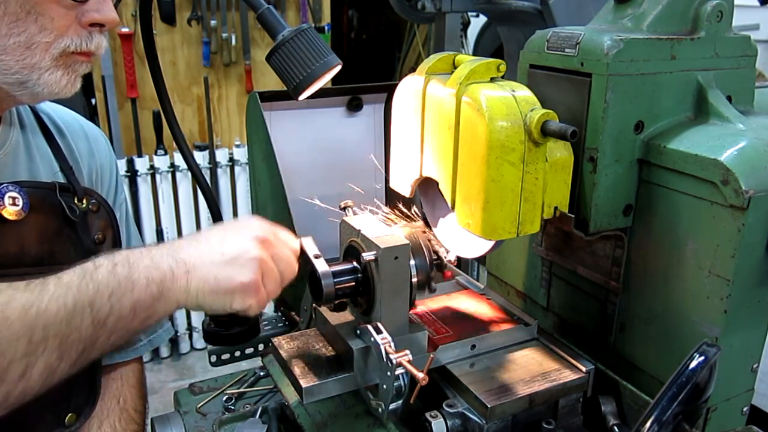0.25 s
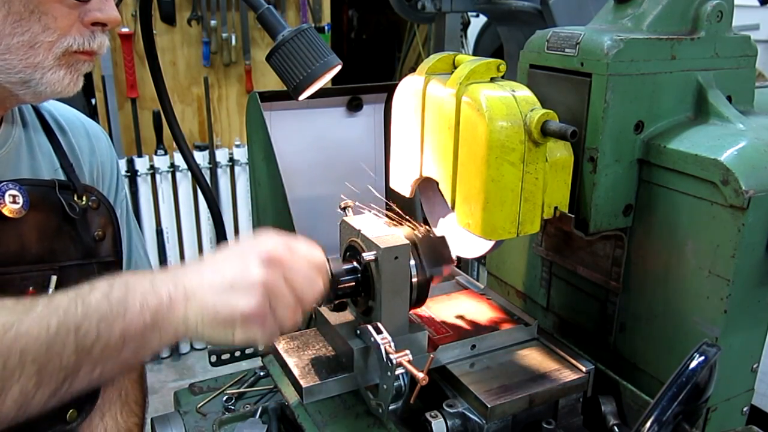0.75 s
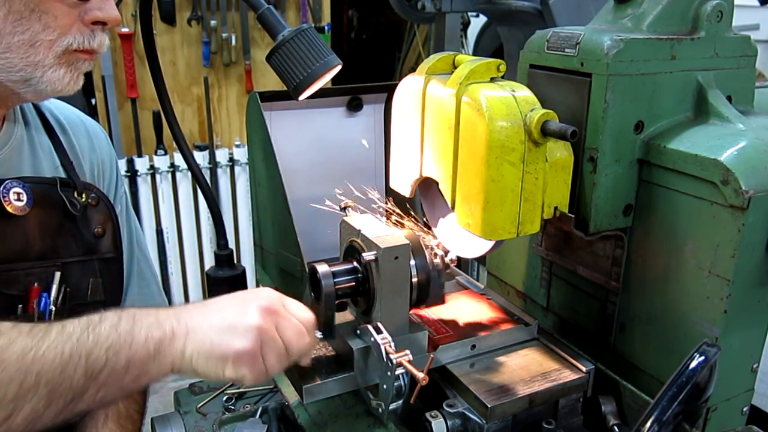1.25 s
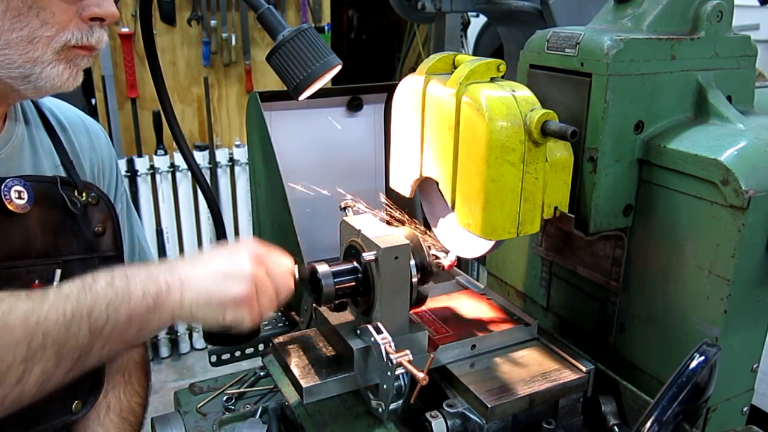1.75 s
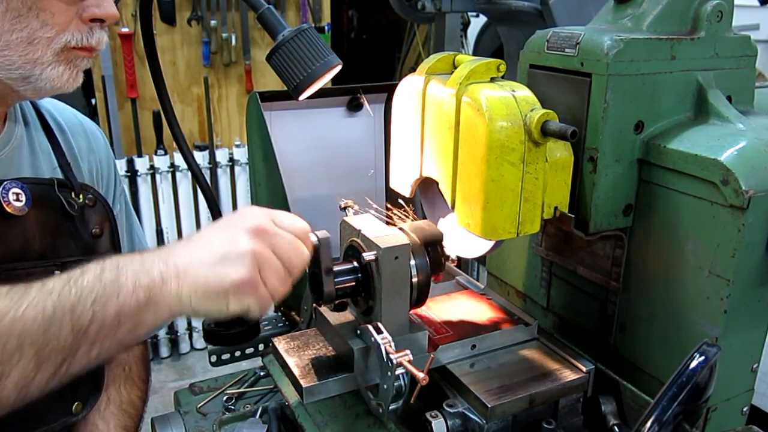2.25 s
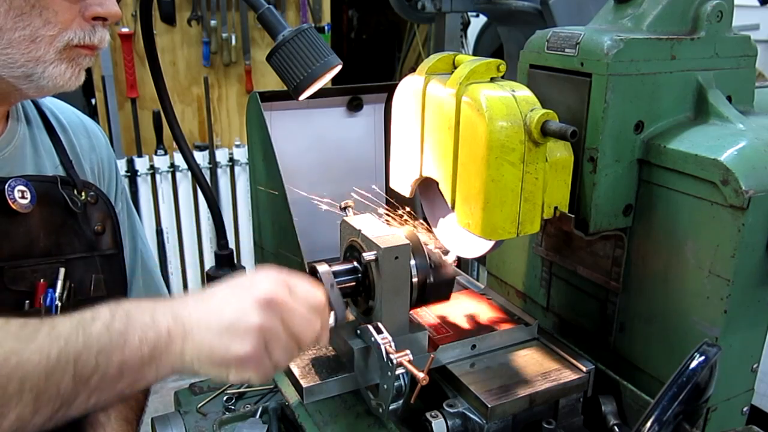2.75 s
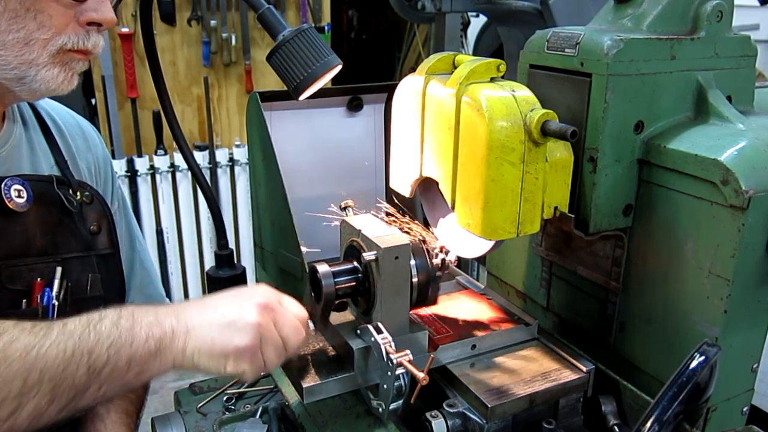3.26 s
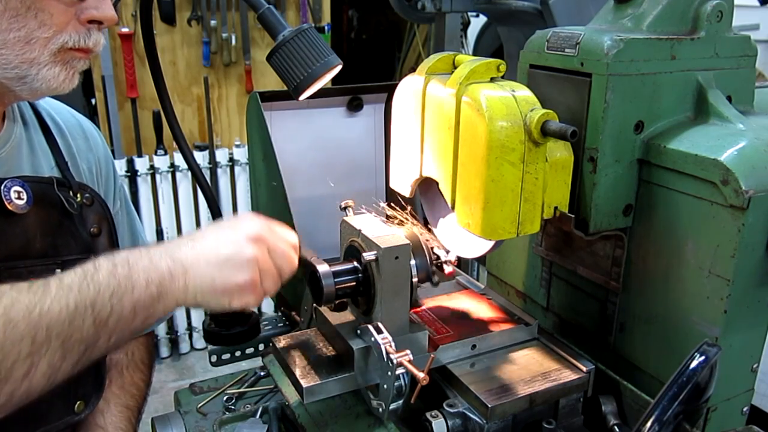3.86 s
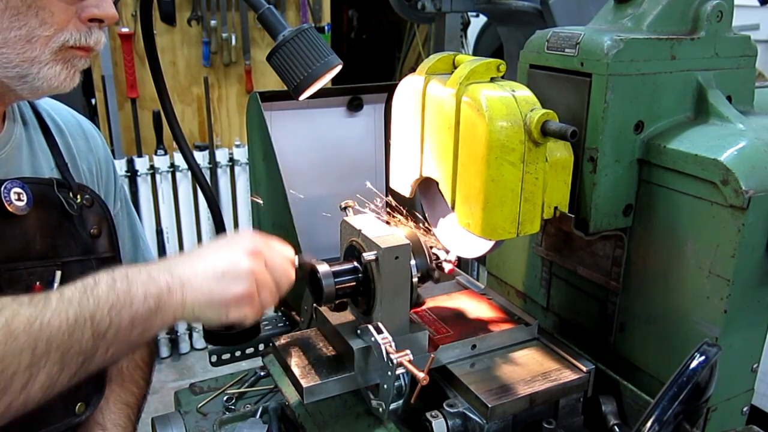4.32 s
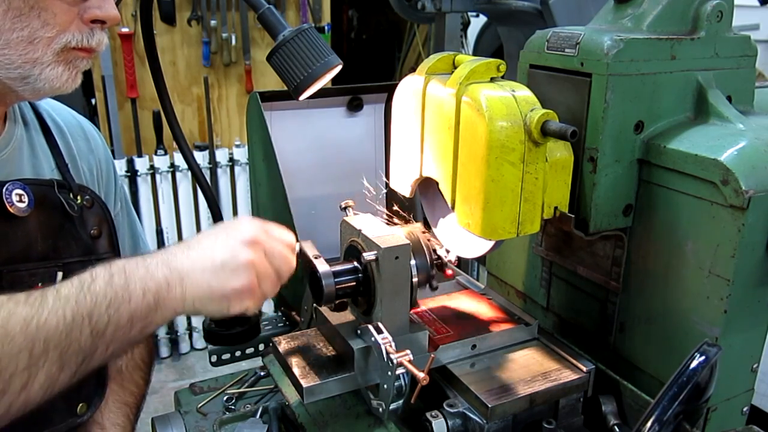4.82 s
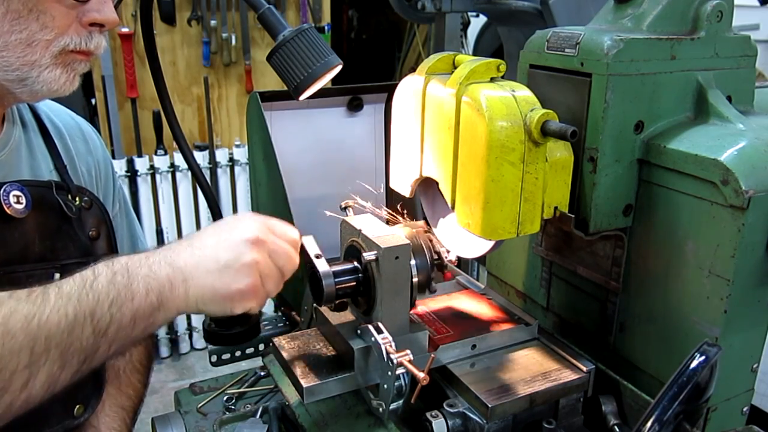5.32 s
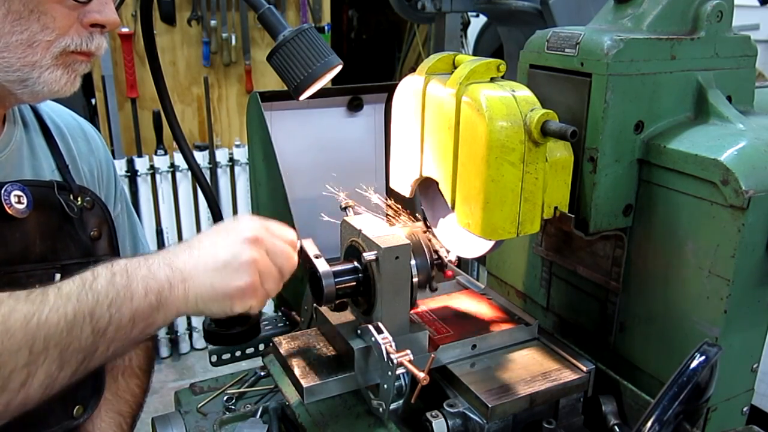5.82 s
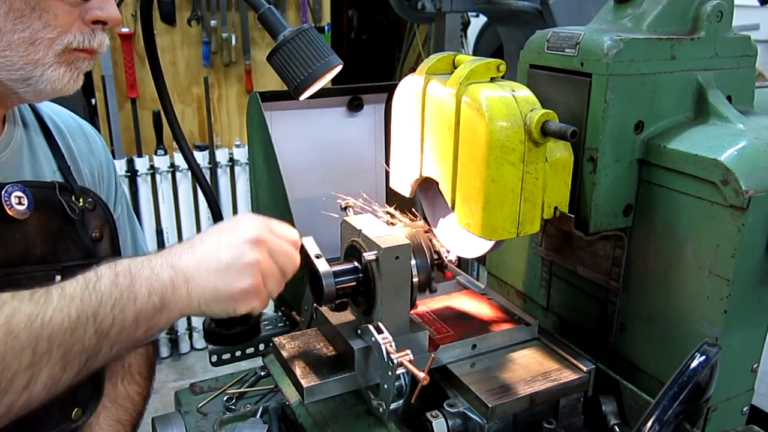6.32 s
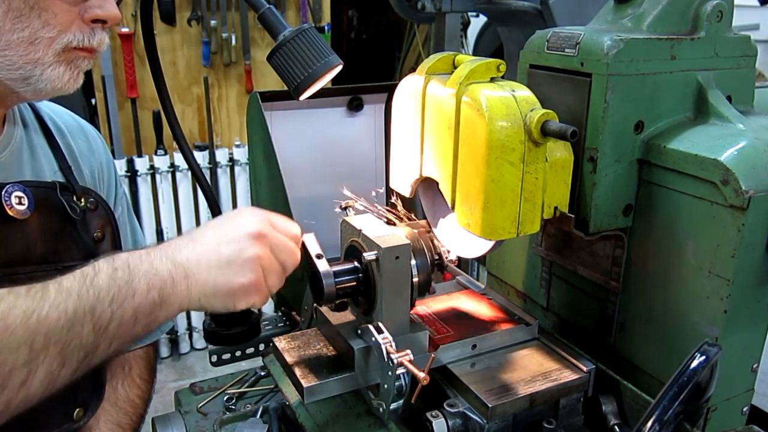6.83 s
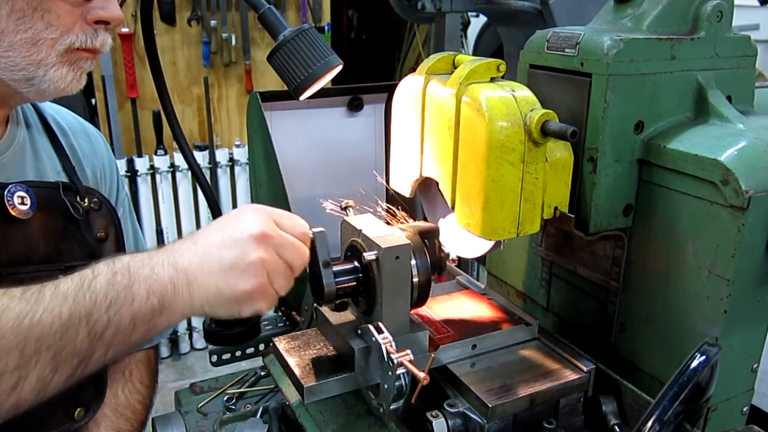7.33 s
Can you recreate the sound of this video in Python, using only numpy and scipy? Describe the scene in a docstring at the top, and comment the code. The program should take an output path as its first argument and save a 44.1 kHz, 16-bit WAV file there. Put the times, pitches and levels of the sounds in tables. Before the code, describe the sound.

Close in a small workshop, a constant electric machine whine carries fine gritty grinding hiss and thin metallic ringing that changes pitch with each half-second crank turn.

```python
"""A surface grinder's motor whines on many multiples of its shaft speed, in clusters that throb once a turn.
A steel part is cranked round by hand against the wheel, close by in a small shop: each angle of the part
sings with its own high resonances, made from wandering tones, and the grit hisses as shaped noise.
Below lie the steady hum tones of spindle, mains and drive, and the noise of air dragged by the wheel."""
import sys
import numpy as np
from scipy import signal
from scipy.fft import rfft, irfft, next_fast_len
from scipy.io import wavfile
from scipy.ndimage import uniform_filter1d, map_coordinates

SR = 44100
rng = np.random.default_rng(int(sys.argv[2]) if len(sys.argv) > 2 else 0)


def generate_wav(sig):
    """Save sig (samples, or channels by samples) to the path in sys.argv[1] as 16-bit PCM at SR."""
    pcm = np.round(np.clip(np.atleast_2d(sig).T, -1, 1) * 32767).astype(np.int16)
    wavfile.write(sys.argv[1], SR, pcm)


N = 334278

SHAFT_HZ, WHEEL_HZ = 25.152, 59.75  # rotation rates of motor and wheel
TOP_HZ = 15700
# Moments at which the crank passes its zero angle. Each entry: time in seconds.
CRANK_PASS_S = [-.3, .09, .48, .87, 1.26, 1.65, 2.04, 2.43, 2.82, 3.22, 3.71, 4.18, 4.65, 5.15, 5.63, 6.14,
                6.63, 7.1, 7.55, 8]


def amp(db):
    """Decibels to gain."""
    return 10 ** (np.asarray(db) / 20)


def unit(x):
    """Scale to rms 1."""
    return x / np.sqrt(np.mean(x ** 2) + 1e-20)


def along(points, hz):
    """Interpolate (Hz, value) points on a log frequency axis."""
    f, v = np.transpose(points)
    return np.interp(np.log(hz + 1), np.log(f + 1), v)


def clock():
    """Time of every sample in seconds."""
    return np.arange(N) / SR


def swings(rows):
    """Each level column per sample, in dB about the mean of its rows."""
    s, *columns = np.transpose(rows)
    return [np.interp(clock(), s, column - np.mean(column)) for column in columns]


def wobble(knots_per_s):
    """Smooth random curve through normally distributed knots."""
    steps = np.arange(0, N / SR * knots_per_s + 1, 1 / 8)
    knots = rng.standard_normal(int(steps[-1]) + 4)
    return np.interp(clock() * knots_per_s, steps, map_coordinates(knots, [steps]))


def filtered(x, response):
    """Multiply the spectrum of x by a response of frequency."""
    size = next_fast_len(N + 8192)
    hz = np.fft.rfftfreq(size, 1 / SR)
    return irfft(rfft(x, size) * response(hz), size)[..., :N]


def rush(colour):
    """Stereo noise of the given colour with a mid of rms 1, less alike left and right in the treble."""
    # Each row: frequency in Hz, left-right likeness from 0 to 1.
    alike = [(60, .99), (200, 0.73), (640, 0.72), (1400, 0.69), (3100, 0.6), (6800, 0.38), (15000, 0.067)]

    def mid_side(hz):
        half_angle = np.arccos(np.clip(along(alike, hz), 0, 1)) / 2
        return colour(hz) * np.array([np.ones_like(hz), np.tan(half_angle)])

    mid, side = filtered(rng.standard_normal((2, N)), mid_side)
    return np.array([mid + side, mid - side]) / np.std(mid)


def flutter(x, depth_db):
    """Waver each narrow band in level by itself, alike left and right; depth_db is rms."""
    z = signal.stft(x, nperseg=512)[2]
    field = rng.standard_normal(z.shape[1:])
    field = uniform_filter1d(field, size=4, axis=0)  # across bins
    field = uniform_filter1d(field, size=7, axis=1)  # across frames
    return signal.istft(z * amp(depth_db * unit(field)), nperseg=512)[1][:, :N]


def revolve(lines, turns, size=16384):
    """Play one shaft turn, given as complex rms per multiple, over and over."""
    cycle = irfft(lines, size) * size / np.sqrt(2)
    return np.interp(turns % 1 * size, np.arange(size + 1), np.append(cycle, cycle[0]))


def motor(whine_db, overtone_db, drift=0.0001994, scatter_db=5.5, spread=0.19, loose_rad=0.59,
          loose_hz=5000, count=620, main_order=30, cluster_size=15):
    """Slots passing the poles sing in clusters of shaft multiples; each cluster swells once a turn."""
    # Strong lines. Each row: multiple of the shaft speed, nominal level in dB rms.
    orders = [(30, -16.6), (31, -38.9), (44, -46.3), (45, -39.1), (46, -28.4), (52, -44.2), (59, -36.6),
              (60, -32.0), (61, -31.5), (74, -42.1), (76, -34.4), (82, -43.7), (84, -44.9), (88, -39.3),
              (89, -34.1), (90, -41.5), (91, -34.4), (99, -45.5), (104, -45.3), (112, -43.2), (118, -37.6),
              (119, -39.6), (121, -36.7), (122, -42.3), (123, -41.0), (126, -44.9), (129, -40.2),
              (133, -43.8), (134, -41.2), (136, -35.6), (137, -40.4), (151, -38.3), (152, -38.7),
              (153, -45.2), (181, -42.9), (185, -46.0), (192, -44.0), (193, -40.3), (203, -45.8),
              (204, -46.5), (206, -46.4), (207, -41.5), (226, -41.5), (231, -41.1), (233, -42.0),
              (234, -37.6), (236, -41.1), (237, -43.8), (265, -46.3), (269, -44.8), (274, -45.3),
              (281, -42.7)]
    # Weak lines between them. Each row: frequency in Hz, level in dB before scatter and trim.
    weak = [(200, -72), (400, -59), (650, -60.5), (950, -61.5), (1300, -49.5), (1750, -59.5), (2500, -55.5),
            (4100, -55.5), (5600, -60.5), (7200, -57.5), (9500, -64), (12500, -73.5), (15000, -89)]
    # Where clusters swell. Each row: frequency in Hz, shaft angle in turns.
    throb = [(1130, .54), (1510, .77), (1890, .48), (2260, .14), (3020, .3), (3400, .33), (3770, .19),
             (4900, .25)]
    k = np.arange(count)
    hz = k * SHAFT_HZ
    level_db = along(weak, hz) + scatter_db * rng.standard_normal(count) - 0.5
    for multiple, db in orders:
        level_db[round(multiple)] = db

    # neighbours loosely share a carrier phase and the shaft angle at which they add up
    cluster = (k + cluster_size // 2) // cluster_size
    start, chance = rng.random((count, 2))[cluster].T
    centre_hz = cluster * cluster_size * SHAFT_HZ
    angle = np.where(centre_hz < throb[-1][0], along(throb, centre_hz), chance)
    stray_rad = (loose_rad + hz / loose_hz) * rng.standard_normal(count)
    phase = 2 * np.pi * (start - k * angle) + stray_rad
    lines = amp(level_db) * np.exp(1j * phase) * (k > 0)

    turns = np.cumsum(SHAFT_HZ * (1 + drift * wobble(7))) / SR
    whine = revolve(lines * (k == main_order), turns) * amp(whine_db + 0.29 * wobble(22))

    # shop reflections place each line between the ears, more widely up to 5 kHz
    scatter = rng.standard_normal(count) + 1j * rng.standard_normal(count)
    place = spread * np.clip(hz / 5000, 0, 1) * scatter
    others = lines * (k != main_order)
    overtones = np.array([revolve(others * (1 + sign * place), turns) for sign in (1, -1)])
    return whine + flutter(overtones, depth_db=0.62) * amp(overtone_db)


def crank_turns():
    """Crank position at every sample, in turns."""
    return np.interp(clock(), CRANK_PASS_S, np.arange(len(CRANK_PASS_S)))


def passing(angle, spread):
    """Gaussian swell, peaking at 1, as the crank passes an angle; both arguments in turns."""
    away = (crank_turns() - angle + .5) % 1 - .5
    return np.exp(-.5 * (away / spread) ** 2)


def wheel_bite(once_db, twice_db):
    """The wheel is not quite round: it bites harder once and twice a revolution."""
    angle = 2 * np.pi * WHEEL_HZ * clock()
    return unit(amp(once_db * np.cos(angle) + twice_db * np.cos(2 * angle)))


def chatter(centre_hz, width_hz, steadiness=0.57):
    """A mode kept ringing by friction: its phase wanders while its strength saturates."""
    envelope = unit(wobble(3 * width_hz)) + 1j * unit(wobble(3 * width_hz))
    envelope = envelope / (np.abs(envelope) + .1) ** steadiness
    return unit(np.real(envelope * np.exp(2j * np.pi * centre_hz * clock())))


def singing(vary_db=1.37, echo_db=-7):
    """As the part turns, the contact moves over its modes and wakes each in turn."""
    # Part resonances. Each row: frequency in Hz, width setting in Hz, nominal level in dB rms at the swell's
    # peak, crank angle at which it sings in turns, spread in turns.
    rings = [(4668, 26, -34, .2, .08), (4690, 90, -37, .6, .08), (5501, 14, -25, .02, .06),
             (5500, 20, -27, .53, .085), (5560, 26, -30, .36, .06), (5570, 45, -32, .91, .05),
             (5790, 110, -29, .22, .08), (5900, 90, -30, .75, .08), (6470, 70, -36, .78, .06),
             (6883, 35, -35, .22, .08), (6885, 45, -32, .66, .09), (7340, 140, -31, .99, .05),
             (7250, 200, -33, .52, .07), (8080, 22, -33, .87, .07), (8060, 90, -37, .08, .06),
             (8440, 20, -39, .72, .12), (8710, 80, -33, .37, .06), (8645, 55, -31, .6, .075),
             (9105, 30, -28.5, .14, .045), (9125, 45, -32, .57, .08), (9090, 20, -36.5, .79, .06),
             (10790, 40, -40, .59, .08), (10790, 40, -45, .97, .08), (12900, 120, -44, .22, .07)]
    crank = crank_turns()
    turn_count = len(CRANK_PASS_S)
    ringing = np.zeros(N)
    for centre_hz, width_hz, db, angle, spread in rings:
        vary = np.interp(crank, np.arange(turn_count), rng.standard_normal(turn_count))
        ringing += passing(angle, spread) * amp(db + vary_db * vary) * chatter(centre_hz, width_hz)
    ringing = ringing * wheel_bite(2.1, 1.1)
    # near walls and the machine's faces scatter it unequally to left and right, over 25 ms
    walls = rng.standard_normal(SR // 40) * np.linspace(1, 0, SR // 40)
    side = amp(echo_db) * signal.fftconvolve(ringing, walls / np.linalg.norm(walls))[:N]
    return np.array([ringing + side, ringing - side])


def hiss(grit_db=-28.5, grain_db=1.0):
    """Countless grains tear off chips in uneven clumps: shaped noise with fast level changes."""
    # Grit on steel. Each row: frequency in Hz, relative spectral level in dB.
    grit = [(2500, -21), (4200, -9.5), (4800, -2), (5300, -3), (5800, 1.5), (6300, -4), (7200, -5),
            (8800, -5), (9900, -10), (11500, -12.5), (13000, -13.5), (14800, -25), (15500, -37)]
    tearing = flutter(rush(lambda hz: amp(along(grit, hz))), depth_db=3.5)
    clumps = unit(amp(grain_db * wobble(900)))
    return amp(grit_db) * tearing * wheel_bite(0.36, 0.34) * clumps


def cut():
    """Hiss and singing follow feed and hand; at the part's high spot singing grows and hiss dips slightly."""
    # Feed against the wheel. Each row: time in seconds, level in dB (used about the mean).
    feed = [(0.0, -21.5), (0.57, -22.5), (1.5, -21), (2.22, -23.5), (2.55, -20), (3.0, -23), (3.31, -21.5),
            (3.93, -22), (4.33, -20), (4.52, -23.5), (4.75, -24.5), (5.13, -21.5), (5.49, -24), (5.83, -21),
            (6.56, -20.5), (6.84, -23), (7.58, -22.5)]
    feed_db, = swings(feed)
    hand_db = 0.2 * wobble(9.9)  # uneven hand pressure
    high_spot = passing(angle=0.55, spread=0.041)
    contact = amp(-0.5 * high_spot) * hiss() + amp(2 * high_spot) * singing()
    return amp(feed_db + hand_db) * contact


def spindle(air_db=-31.5):
    """Spindle, mains and drive hum in steady sines; the wheel drags air round its guard, with bearing noise."""
    # Hum tones. Each row: frequency in Hz, nominal level in dB rms.
    hum_tones = [(59.2, -52), (60, -63), (179.4, -61), (239.3, -56), (358.9, -52), (377.3, -48),
                 (402.4, -53), (520.6, -52), (1192, -42), (1217, -47), (14900, -51)]
    # Dragged air and bearings. Each row: frequency in Hz, relative spectral level in dB.
    air = [(25, -34), (130, -15), (220, -18), (350, -6), (480, -12), (640, -6.5), (750, -1), (950, -11),
           (1300, -2.5), (1750, -13.5), (2200, -3.5), (2650, -7), (3200, -4), (4500, -22)]
    hum = np.zeros(N)
    for hz, db in hum_tones:
        hum += amp(db) * np.sqrt(2) * np.sin(2 * np.pi * (hz * clock() + rng.random()))
    return hum + amp(air_db) * flutter(rush(lambda hz: amp(along(air, hz))), depth_db=2.63)


def scene():
    """Sum motor, cut and wheel, then set level and phase between the two microphone ports."""
    # Level that dips abruptly at times and creeps back. Each row: time in seconds, main whine level in dB,
    # overtone level in dB (levels used about their means).
    level_curve = [(0.03, -16.5, -20.5), (0.17, -17, -21), (0.34, -16.5, -20), (0.45, -18, -22.5),
                   (0.82, -17, -20.5), (1.26, -18, -21.5), (1.96, -16.5, -20), (2.0, -19, -23.5),
                   (2.25, -17.5, -21), (2.94, -18, -21.5), (3.19, -17, -21), (3.55, -17.5, -21.5),
                   (5.62, -16.5, -20), (6.1, -18, -23), (6.63, -17.5, -21.5), (6.69, -19, -23),
                   (6.86, -17.5, -21.5), (7.55, -17.5, -22)]
    # Each row: frequency in Hz, left minus right in dB.
    balance = [(200, 0), (750, -.9), (1160, -.6), (1530, -.3), (1910, -.7), (2260, -3.9), (3040, -.1),
               (9000, -.5), (13000, 2.8)]
    # Each row: frequency in Hz, phase by which left leads in radians.
    lead = [(300, 0), (755, -.21), (1157, -1.18), (1530, -1.32), (1910, -.08), (2260, .32), (3040, -.15),
            (3800, -.06), (5200, -.4), (9000, -.05)]
    whine_db, overtone_db = swings(level_curve)
    machine = motor(whine_db, overtone_db) + cut() + amp(overtone_db) * spindle()

    def ports(hz):
        half = np.array([[.5], [-.5]])
        lead_rad = along(lead, hz)
        gain = amp(half * along(balance, hz)) / np.cos(lead_rad / 2)  # cosine keeps the mid level
        return gain * np.exp(1j * half * lead_rad)

    return filtered(machine, ports)


def record(dry):
    """Round off the highest peaks towards 0.8, then remove everything from TOP_HZ up."""
    rounded = dry / (1 + (dry / .8) ** 8) ** (1 / 8)
    return filtered(rounded, lambda hz: hz < TOP_HZ)


dry = scene()
out = record(dry)
generate_wav(out)
```